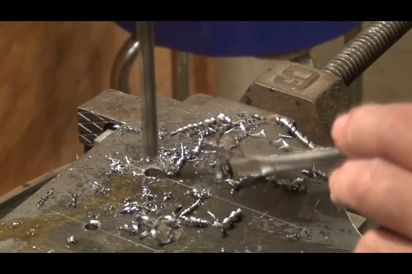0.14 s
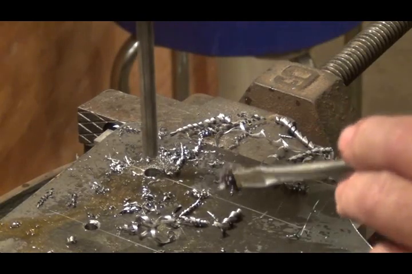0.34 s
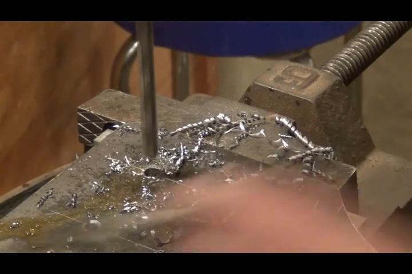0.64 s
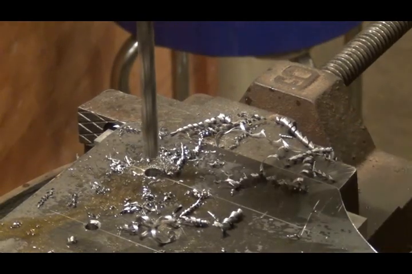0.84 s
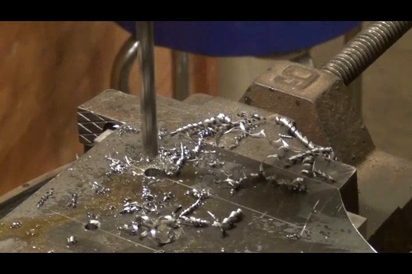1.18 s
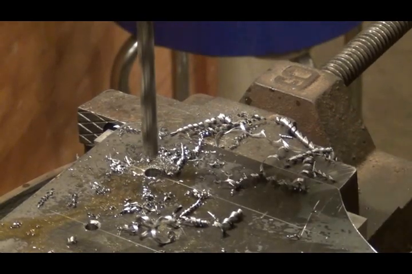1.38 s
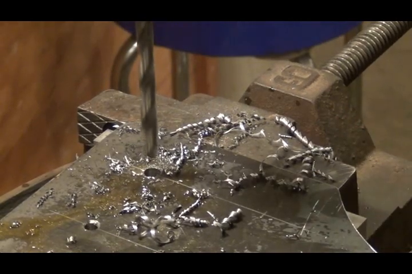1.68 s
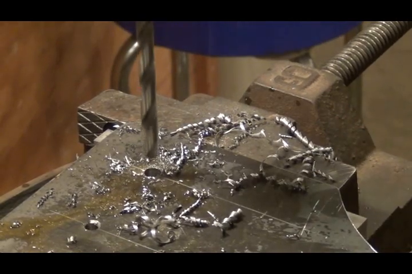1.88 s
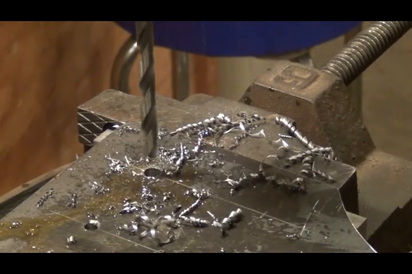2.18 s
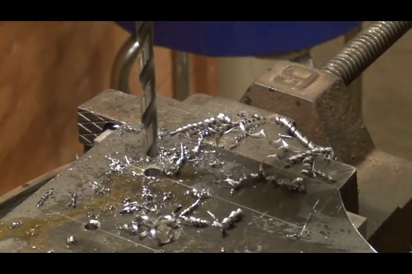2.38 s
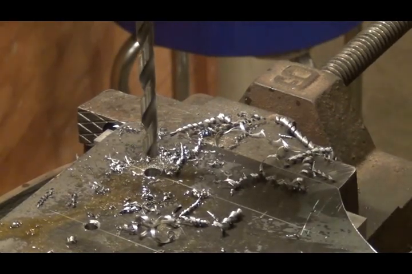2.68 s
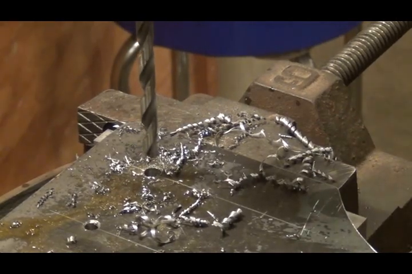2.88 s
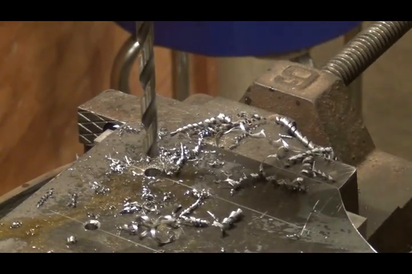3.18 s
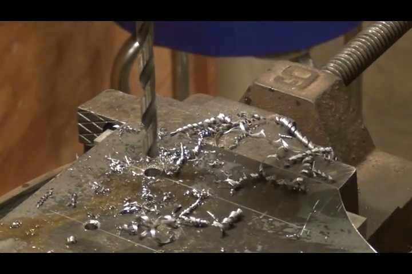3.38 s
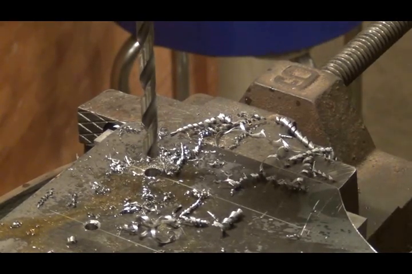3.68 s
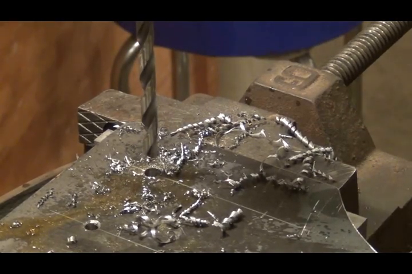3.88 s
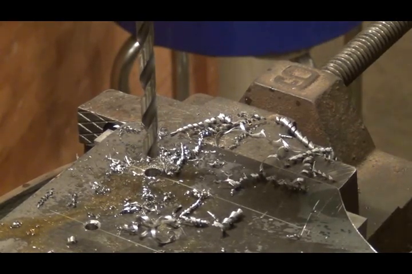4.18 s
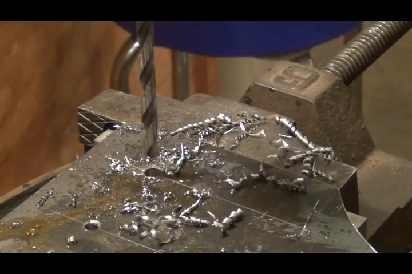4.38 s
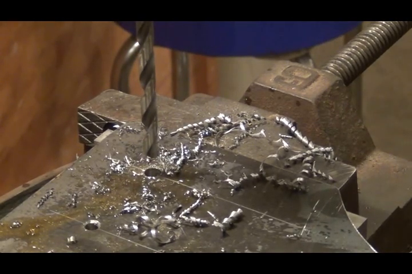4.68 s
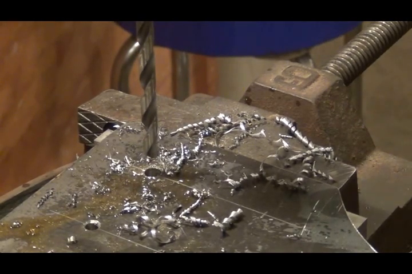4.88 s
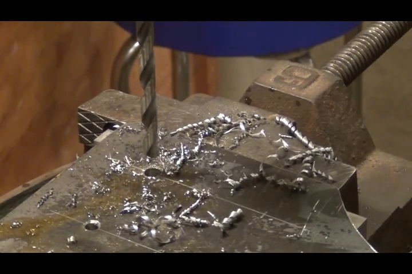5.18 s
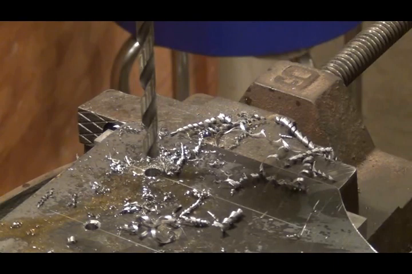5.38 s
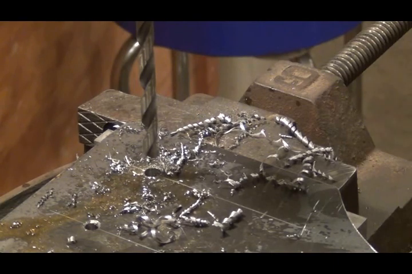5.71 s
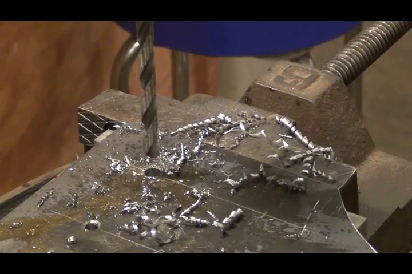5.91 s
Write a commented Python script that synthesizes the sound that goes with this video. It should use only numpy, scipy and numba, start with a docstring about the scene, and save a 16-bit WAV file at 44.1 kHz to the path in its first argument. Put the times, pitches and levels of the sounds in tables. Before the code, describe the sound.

A loud, rough machine rumble fills the first half second, then a switch clacks and the drill press winds down, wobbling and rattling lightly. Around a second and a half, something scrapes briefly and a tool clacks with a short plate ring. Afterwards soft knocks, cloth-like shuffling, a faint treble flicker and tiny gritty chip strokes sit above steady hiss in a small, lightly reverberant workshop.

```python
"""Small workshop, microphone facing a drill press and its bench: the press coasts to a stop over room hiss.
Shaken resonances make its casting rumble; decaying modes make a loose part rattle and a switch and a tool clack.
Afterwards steel chips are scuffed over a plate in short strokes of grainy noise, with dull band-passed knocks,
a brief drag, low shuffling and an evenly paced treble flicker. Short reflections and a diffuse tail give the room."""
import sys
import numpy as np
from scipy import signal
from scipy.fft import rfft, irfft, next_fast_len
from scipy.io import wavfile
from scipy.ndimage import uniform_filter1d
from numba import njit

SR = 44100
rng = np.random.default_rng(int(sys.argv[2]) if len(sys.argv) > 2 else 0)


def dump(signal):
    """Clip the signal to [-1, 1] and save it as 16-bit WAV at the path in sys.argv[1]."""
    limited = np.clip(np.atleast_2d(signal).T, -1, 1)
    pcm = np.round(limited * 32767).astype(np.int16)
    wavfile.write(sys.argv[1], SR, pcm)


N = 266805
T = np.arange(N) / SR  # time of every sample, s

# room air and microphone noise [f/Hz, level/dB per Hz]
HISS_SPECTRUM = [(18, -58), (30, -3), (106, 4.5), (300, -6), (710, -3), (786, -2.5), (1240, -2.5),
                 (1440, -2.5), (2160, -6.5), (11500, -11), (12700, -17.5), (16500, -36), (22000, -120)]
# left-right correlation of the hiss [f/Hz, correlation]
HISS_LIKENESS = [(200, 0.73), (600, 0.57), (2000, 0.61), (4000, 0.89)]
# gain on the left-right difference of the hiss [f/Hz, level/dB]
HISS_SIDE_GAIN = [(130, -43), (260, 8)]
# coasting press [t/s, rumble level/dB, casting boom minus rumble level/dB]
PRESS_COAST = [(0, -18.5, -5), (.12, -20.5, -7), (.21, -14.5, -7), (.34, -21.5, 3), (.46, -23.5, -3.5),
               (.6, -29, 5), (.72, -37, 0.5), (.95, -39, 2.5), (1.2, -50.5, 0), (1.5, -51, 0),
               (1.8, -54, -3), (2.1, -49, -12.5)]
# short swells of the casting's boom [t/s, level/dB]
BOOM_SWELLS = [(.52, 7.5), (.82, 6.5), (.92, 4), (1.07, 5.5), (1.27, 7), (1.4, 5.5), (1.62, 4)]
# casting resonances, low [f/Hz, width/Hz, level/dB]
BOOM_RESONANCES = [(222.4, 13, -6), (270.4, 14.7, 4), (246.4, 30, -4), (290.7, 7.7, -0.5), (375, 17, -5.5)]
# casting resonances, higher [f/Hz, width/Hz, level/dB]
RUMBLE_RESONANCES = [(448, 20.8, -18), (558, 12, -4), (703, 68, -3), (684, 48, 6), (836, 20, 4.5),
                     (944, 84, 0), (1177, 20, 0.5), (1187, 16, -6), (1385, 18, -8)]
# broad noise under the rumble [f/Hz, level/dB per Hz]
RUMBLE_SPECTRUM = [(35, -91), (60, -59), (107, -34), (277, -6), (471, -5), (1220, -10), (2500, -26),
                   (3250, -54.5), (5500, -120)]
# bearing grind [f/Hz, level/dB per Hz]
GRIND_SPECTRUM = [(1000, -17), (1700, -6), (2460, -4), (3060, -0.5), (3410, -11.5), (3950, -5.5),
                  (4840, -12), (10400, -23), (11700, -37.5), (12000, -65.5), (15600, -106), (22000, -120)]
# motor tones [f/Hz, level/dB]
HUM_TONES = [(119, -39.5), (154, -39.5)]
# scratchy ticks [t/s, peak level/dB, centre f/Hz]
SCRATCH_TICKS = [(0.023, -19, 9500), (0.059, -26, 10000), (0.087, -21, 5700), (.134, -26, 6000),
                 (0.181, -11, 3530), (0.198, -20.5, 6240), (0.218, -12, 5540), (.274, -22.5, 6300),
                 (.294, -21, 4000), (0.421, -39, 3880), (0.616, -27, 4250), (0.647, -38, 8500)]
# sharp metal clacks [t/s, level/dB, ring level/dB, splash t60/s, left minus right level/dB]
CLACK_EVENTS = [(.525, -7.5, -9, 0.047, -1), (0.532, -27, -33, 0.29, 0), (1.641, -19.5, -35, .12, 5.5),
                (1.647, -12.5, -2.5, 0.1, 3.5), (1.660, -27, -28, 0.4, 0)]
# ring of the clacked plate [f/Hz, level/dB, t60/s]
PLATE_MODES = [(292, -6, .3), (375, -9, .2), (500, -1, .17), (535, -4, .2), (645, -7, .2), (685, -1, .4),
               (1010, -9, .25), (1335, -19, 1.0)]
# dense high modes of a clack [f/Hz, level/dB per Hz]
SPLASH_SPECTRUM = [(200, -39), (500, -14), (1400, 1), (1650, -7.5), (2000, 4), (3900, 2), (5200, -0.5),
                   (6800, 1.5), (11200, -8), (12600, -17)]
# dull knocks on the bench [t/s, peak level/dB, centre f/Hz]
BENCH_KNOCKS = [(0.615, -20, 990), (1.427, -26, 1190), (2.270, -35.5, 1055), (2.417, -35, 755),
                (2.498, -38, 302), (2.519, -39, 546), (2.574, -40, 182), (2.674, -45, 312),
                (3.119, -34.5, 850), (3.168, -28.5, 507), (4.26, -36.5, 198), (4.658, -32.5, 580),
                (5.276, -41, 346), (5.414, -48, 298), (5.535, -44.5, 269), (5.808, -39.5, 355),
                (5.947, -39.5, 490)]
# ticks of the loose part [t/s, level/dB]
RATTLE_TICKS = [(0.689, -38), (0.7294, -21), (0.762, -31), (0.7928, -33), (0.8773, -28.5), (0.9096, -28.5),
                (0.996, -44), (1.051, -37), (1.082, -35.5)]
# ring of the loose part [f/Hz, level/dB, t60/s]
LOOSE_PART_MODES = [(2635, 0, .045), (5255, -2, .03), (7035, -3, .045), (7900, -12, .03), (10800, -7, .04)]
# resonances of the dragged part [f/Hz, width/Hz, level/dB]
DRAG_RESONANCES = [(1220, 300, -3), (2610, 450, -1), (5570, 500, -4), (6560, 2700, -5)]
# strokes through chips [start t/s, rise t/s, hold t/s, level/dB, centre f/Hz, plate minus chips level/dB]
CHIP_STROKES = [(1.83, 0.024, 0.28, -60.5, 4320, -8), (2.617, .02, .08, -66.5, 4000, 9.5),
                (2.72, 0.023, .015, -56, 9100, -7), (3.112, .01, 0.042, -54.5, 8550, 1.5),
                (4.181, 0.034, 0.062, -50, 5330, 0.5), (4.462, 0.038, 0.028, -43, 3180, -5),
                (4.537, 0.01, 0.0084, -46, 6560, 1), (4.655, 0.0045, 0.022, -50.5, 3480, 1.5),
                (4.805, 0.033, 0.12, -47, 6500, -6), (5.27, .012, 0.028, -51.5, 10000, -11),
                (5.392, 0.016, 0.057, -55, 7600, -0.5), (5.804, .005, 0.041, -39, 7900, -15.5),
                (5.824, 0.022, 0.022, -40.5, 6660, -12)]
# shuffling about the bench [t/s, level/dB]
SHUFFLE_LEVEL = [(2.3, -53), (2.41, -61), (2.43, -52), (2.62, -56), (2.86, -63), (4.02, -65.5), (4.73, -56),
                 (5.2, -60.5), (5.46, -53.5), (5.7, -60.5), (6.05, -56)]
# cloth and feet [f/Hz, level/dB per Hz]
SHUFFLE_SPECTRUM = [(47, -42), (80, -8.5), (239, -1.5), (610, -3.5), (665, -2.5), (746, -3.5), (1390, -7),
                    (2500, -12), (3250, -36), (5500, -120)]
# side against mid of near reflections [f/Hz, level/dB]
REFLECTION_WIDTH = [(60, -1), (250, -6), (640, -4), (1200, -9), (4000, -9)]
# gain on the left-right difference of all diffuse sound [f/Hz, level/dB]
DIFFUSE_SIDE_GAIN = [(4400, -6), (5000, -45)]

HISS_DB = -56.5
SWITCH_OFF_S, MOTOR_T60_S = 0.535, 0.33
GRIND_DB, GRIND_PER_RUMBLE = -31.5, 0.89  # level at a rumble of -20.5 dB; dB per dB
STOP_S, STOP_FADE_S, SWELL_S = 2.32, 0.58, 0.018
TICK_T60_S, KNOCK_T60_S = 0.063, 0.22
RATTLE_DULL_DB_PER_OCTAVE = 5.46
DRAG_START_S, DRAG_END_S, DRAG_DB = 1.427, 1.52, -43
STROKE_WIDTH_HZ = 7900
LIFT_T60_S, SETTLE_T60_S, SETTLE_DB = 0.097, 0.52, -5  # the tool lifts, stray chips settle
FLICKER_START_S, FLICKER_END_S, FLICKER_PERIOD_S, FLICKER_WIDTH_S = 2.82, 4.13, .097, .018
FLICKER_DB, FLICKER_FADE_DB_PER_S = -61, -2.5
ROOM_DB, ROOM_T60_S, ROOM_WIDTH_HZ = -12.5, 0.16, 5000
TOP_HZ = 12650


def undb(db):
    """dB to gain."""
    return 10 ** (np.asarray(db) / 20)


def unit(x):
    """Scale to rms 1."""
    return x / np.sqrt(np.mean(x ** 2))


def on_log(hz, table):
    """Read a (f/Hz, value) table on a log-frequency axis."""
    f, v = np.transpose(table)
    return np.interp(np.log(np.maximum(hz, 1)), np.log(f), v)


def colour(x, table):
    """Weight a noisy signal by a (f/Hz, level/dB) table, rms 1."""
    n = next_fast_len(len(x))
    hz = np.arange(n // 2 + 1) * SR / n
    return unit(irfft(rfft(x, n) * undb(on_log(hz, table)), n)[:len(x)])


def equalise(x, table):
    """Apply the gains of a (f/Hz, level/dB) table to a full-length signal."""
    hz = np.arange(N // 2 + 1) * SR / N
    return irfft(rfft(x) * undb(on_log(hz, table)), N)


@njit
def svf(x, hz, width):
    """State-variable band-pass with a moving centre, gain 1 there."""
    y, b, l = np.empty(len(x)), 0., 0.
    for i in range(len(x)):
        g, k = np.tan(np.pi * hz[i] / SR), width[i] / hz[i]
        v = (b + g * (x[i] - l)) / (1 + g * (g + k))
        b, l, y[i] = 2 * v - b, l + 2 * g * v, k * v
    return y


def band(x, hz, width_hz):
    """Band-pass, centre fixed or moving."""
    return svf(x, np.clip(hz + 0 * x, 20, .45 * SR), width_hz + 0 * x)


def band2(x, hz, width_1_hz, width_2_hz):
    """Two band-passes in a row on one centre, for steeper skirts."""
    return band(band(x, hz, width_1_hz), hz, width_2_hz)


def grit(scatter_db, grain_s):
    """Noise made of grains of uneven, bounded size."""
    k = max(int(grain_s * SR), 1)
    size_db = scatter_db * np.minimum(rng.exponential(size=N // k + 1), 4)
    size = np.repeat(undb(size_db), k)[:N]
    return unit(rng.standard_normal(N) * uniform_filter1d(size, k))


def curve(table):
    """Columns of a timed table at every sample."""
    s, *columns = np.transpose(table)
    return [np.interp(T, s, c) for c in columns]


def fall(t, t60):
    """Decay by 60 dB in t60."""
    return np.exp(-np.log(1000) * t / t60)


def ring(modes, t, dull_db_per_octave=0., scatter_db=-1.5):
    """One blow on a set of modes; a dull blow drives the high ones less. Peak 1."""
    hz, db, t60 = np.transpose(modes)[:, :, None]
    level_chance, pitch_chance = rng.standard_normal((2, len(modes), 1))
    gain = undb(db + scatter_db * level_chance - dull_db_per_octave * np.log2(hz / hz.min()))
    tones = np.sin(2 * np.pi * hz * (1 + 0.00395 * pitch_chance) * t)
    y = np.sum(gain * fall(t, t60) * tones, axis=0)
    return y / np.max(np.abs(y))


def struck(modes, t, chatter_s, dull_db_per_octave=0.):
    """A clean blow, then the striker chatters for a moment, so the ring is rough. Peak 1."""
    chatter = rng.standard_normal(len(t)) * fall(t, chatter_s)
    chatter[0] = 1.6 * np.sqrt(np.sum(chatter ** 2))
    y = signal.fftconvolve(chatter, ring(modes, t, dull_db_per_octave))[:len(t)]
    return y / np.max(np.abs(y))


def add(out, s, x):
    """Mix x into out from time s."""
    i = int(s * SR)
    out[..., i:i + x.shape[-1]] += x[..., :N - i]


def narrow(pair, gain_table):
    """Filter only the left-right difference of a stereo pair."""
    mid, side = (pair[0] + pair[1]) / 2, (pair[0] - pair[1]) / 2
    side = equalise(side, gain_table)
    return np.array([mid + side, mid - side])


def hiss():
    """Steady room air and microphone noise, partly shared by both sides."""
    mid, side = (rfft(colour(rng.standard_normal(N), HISS_SPECTRUM)) for _ in range(2))
    like = np.clip(on_log(np.arange(len(mid)) * SR / N, HISS_LIKENESS), 0, 1)
    mid = irfft(mid * np.sqrt((1 + like) / 2), N)
    side = irfft(side * np.sqrt((1 - like) / 2), N)
    return undb(HISS_DB) * np.array([mid + side, mid - side])


def powered():
    """1 while the motor is on, dying soon after the switch opens."""
    return np.where(T < SWITCH_OFF_S, 1, fall(T - SWITCH_OFF_S, MOTOR_T60_S))


def tinkles():
    """Many brief metallic pings of random time, pitch and size."""
    out, t = np.zeros(N), T[:SR // 30]
    for when, pitch, size in rng.random((150, 3)):
        ping = fall(t, 0.038) * np.sin(2 * np.pi * 1500 * 5 ** pitch * t)
        add(out, .7 * when, undb(-14 * size) * ping)
    return out


def press():
    """Uneven belt and bearing jolts shake the casting's resonances; bearings grind above them."""
    rumble_db, boom_db = curve(PRESS_COAST)
    swell_db = sum(db * np.exp(-((T - s) / SWELL_S) ** 2) for s, db in BOOM_SWELLS)
    boom_db = boom_db + rumble_db + swell_db
    grind_db = GRIND_DB + GRIND_PER_RUMBLE * (rumble_db + 20.5)

    jolts = grit(3.0, .003)
    boom = sum(undb(db) * unit(band2(jolts, f, 4 * w, w)) for f, w, db in BOOM_RESONANCES)
    peaks = sum(undb(db) * unit(band(jolts, f, w)) for f, w, db in RUMBLE_RESONANCES)
    rumble = unit(peaks) * undb(-8.5) + colour(grit(1.98, .003), RUMBLE_SPECTRUM)
    grind = colour(grit(1.4, .0015), GRIND_SPECTRUM) + undb(4) * tinkles()
    grind += undb(-7) * powered() * unit(band2(jolts, 3030, 250, 250))

    layers = ((boom_db, boom), (rumble_db, rumble), (grind_db, grind))
    still_turning = np.clip((STOP_S - T) / STOP_FADE_S, 0, 1)
    return still_turning * sum(undb(db) * unit(x) for db, x in layers)


def hum():
    """Low motor tones that waver a little in strength."""
    out = np.zeros(N)
    for f, db in HUM_TONES:
        waver = unit(uniform_filter1d(rng.standard_normal(N), SR // 12))
        out += undb(db + 2.0 * waver) * np.sin(2 * np.pi * f * T)
    return powered() * out


def ticks():
    """Short scratches: decaying noise, each with its own colour."""
    out, t = np.zeros(N), T[:SR // 8]
    for s, db, hz in SCRATCH_TICKS:
        scratch = rng.standard_normal(len(t)) * fall(t, TICK_T60_S) * np.minimum(t / 0.0013, 1)
        tick = band2(scratch, hz, 0.41 * hz, 1.2 * hz)
        add(out, s, undb(db) * tick / np.max(np.abs(tick)))
    return out


def clacks():
    """A splash of dense high modes, heard as noise, over the ring of the plate."""
    out, t = np.zeros((2, N)), T[:SR // 2]
    for s, db, ring_db, t60, pan_db in CLACK_EVENTS:
        splash = colour(rng.standard_normal(len(t)), SPLASH_SPECTRUM)
        splash = splash * fall(t, t60) * np.minimum(t / .002, 1)
        plate = band2(struck(PLATE_MODES, t, 0.042), 720, 2000, 2000)
        blow = undb(-3.0) * splash + undb(ring_db) * plate
        sides_db = db + np.array([[pan_db], [-pan_db]]) / 2
        add(out, s, undb(sides_db) * blow)
    return out


def knocks():
    """A short contact push, then a fading noisy boom of the bench."""
    out, t = np.zeros(N), T[:SR // 3]
    for s, db, hz in BENCH_KNOCKS:
        push = 0.055 * rng.standard_normal(len(t)) * fall(t, KNOCK_T60_S)
        push[0] = 1
        contact = band2(push, hz, .5 * hz, 1.46 * hz)
        boom = band(band(push, 258, 160), 343, 420)
        edge = band(band(push, 2150, 3100), 2240, 3100)
        blow = contact + undb(2.0) * boom + undb(-18) * edge
        add(out, s, undb(db) * blow / np.max(np.abs(blow)))
    return out


def rattles():
    """Each tick: the loose part's rough ring and a broad crack."""
    out, t = np.zeros(N), T[:SR // 8]
    for s, db in RATTLE_TICKS:
        crack = band(rng.standard_normal(len(t)), 2500, 2600) * fall(t, 0.095)
        part = struck(LOOSE_PART_MODES, t, 0.043, RATTLE_DULL_DB_PER_OCTAVE)
        add(out, s, undb(db) * (part + undb(-4.5) * crack))
    return out


def drag():
    """Stick-slip grit into a few broad resonances, which rise a little as the part lifts off."""
    release = np.where(T < DRAG_END_S, 1, fall(T - DRAG_END_S, 0.048))
    contact = (T > DRAG_START_S) * fall(T - DRAG_START_S, 0.61) * release
    progress = np.clip((T - DRAG_START_S) / (DRAG_END_S - DRAG_START_S), 0, 1)
    lift = 1 + 0.069 * progress ** 3
    slips = grit(4.0, .005)
    body = sum(undb(db) * unit(band2(slips, f * lift, w, 2 * w)) for f, w, db in DRAG_RESONANCES)
    return undb(DRAG_DB) * contact * body


def strokes():
    """Grainy noise for tiny chip contacts, each stroke with its own centre; the plate answers lower down."""
    out, t = np.zeros(N), T[:SR // 2]
    chips = grit(1.6, .0006)
    plate = unit(band(grit(2.1, 0.0041), 1300, 2440))
    settle = undb(SETTLE_DB)
    for s, rise, hold, db, hz, plate_db in CHIP_STROKES:
        i = int(s * SR)
        u = t[:N - i]
        after = np.maximum(u - rise - hold, 0)
        release = (fall(after, LIFT_T60_S) + settle * fall(after, SETTLE_T60_S)) / (1 + settle)
        envelope = np.minimum(u / rise, 1) ** 2.2 * release
        grains = chips[i:i + len(u)]
        scuff = unit(band2(grains, hz, STROKE_WIDTH_HZ, 2 * STROKE_WIDTH_HZ)) + undb(-10) * grains
        answer = undb(plate_db) * plate[i:i + len(u)]
        add(out, s, undb(db) * envelope * (scuff + answer))
    return out


def shuffle():
    """Cloth and feet: lumpy low noise."""
    start = np.clip((T - SHUFFLE_LEVEL[0][0]) / 0.071, 0, 1)
    return start * undb(curve(SHUFFLE_LEVEL)[0]) * colour(grit(1.6, .006), SHUFFLE_SPECTRUM)


def flicker():
    """Soft short swells of treble noise at an even pace, each a little weaker."""
    swell = np.zeros(N)
    for s in np.arange(FLICKER_START_S, FLICKER_END_S, FLICKER_PERIOD_S):
        fade = undb(FLICKER_FADE_DB_PER_S * (s - FLICKER_START_S))
        swell += fade * np.exp(-((T - s) / FLICKER_WIDTH_S) ** 2)
    treble = band(band(rng.standard_normal(N), 7700, 4000), 8800, 6000)
    return undb(FLICKER_DB) * swell * unit(treble)


def width(x):
    """Reflections from nearby surfaces reach the two sides differently."""
    t = T[:SR // 10]
    echo = rng.standard_normal(len(t)) * fall(t, .12)
    side = signal.fftconvolve(x, echo / np.sqrt(np.sum(echo ** 2)))[:N]
    side = equalise(side, REFLECTION_WIDTH)
    return np.array([side, -side])


def room(x):
    """Diffuse tail, different at each side, in which a middle band outlasts the rest."""
    t = T[:SR]
    tails = []
    for _ in range(2):
        noise = rng.standard_normal(len(t)) * np.minimum(t / 0.03, 1)
        middle = band(noise, 710, ROOM_WIDTH_HZ)
        tail = middle * fall(t, ROOM_T60_S) + (noise - middle) * fall(t, 0.45 * ROOM_T60_S)
        tails.append(signal.fftconvolve(x, tail / np.sqrt(np.sum(tail ** 2)))[:N])
    return undb(ROOM_DB) * np.array(tails)


def scene():
    """The press stands all but centred, 0.2 dB to the right; clacks are panned; the bench is ahead."""
    machine = press() + hum() + ticks() + rattles()
    bench = drag() + knocks() + strokes() + flicker() + shuffle()
    machine_sides_db = np.array([[-0.1], [0.1]])
    near = machine * undb(machine_sides_db) + clacks() + bench
    mono = near.mean(axis=0)
    diffuse = width(mono) + room(mono) + narrow(hiss(), HISS_SIDE_GAIN)
    return near + narrow(diffuse, DIFFUSE_SIDE_GAIN)


def record(dry):
    """The microphone drops the deep bass; a steep low-pass ends the treble."""
    dry = signal.sosfilt(signal.butter(2, 70, "high", fs=SR, output="sos"), dry)
    return signal.sosfilt(signal.ellip(12, .2, 80, TOP_HZ, fs=SR, output="sos"), dry)


dry = scene()
out = record(dry)
dump(out)
```